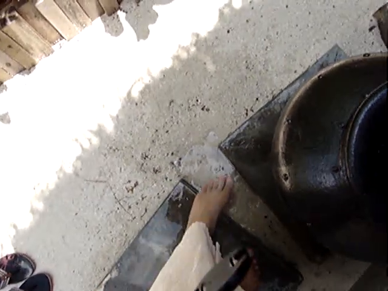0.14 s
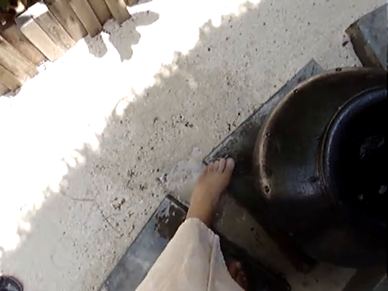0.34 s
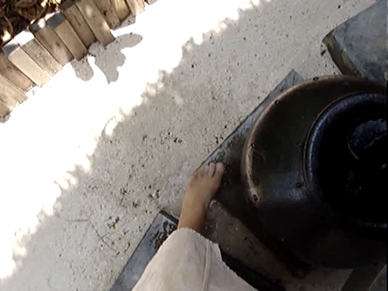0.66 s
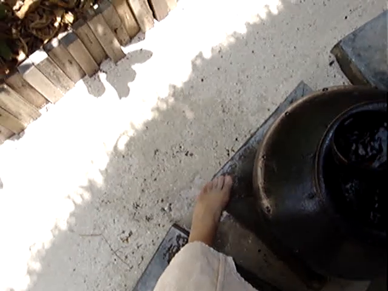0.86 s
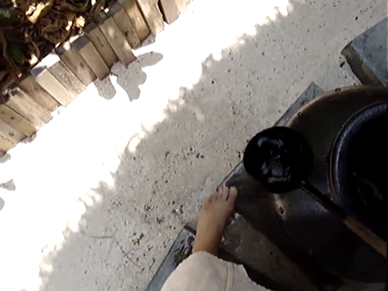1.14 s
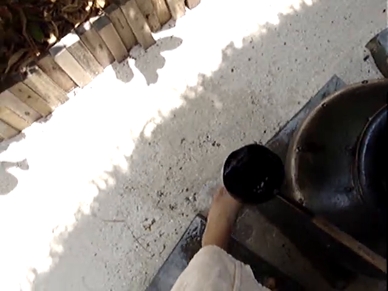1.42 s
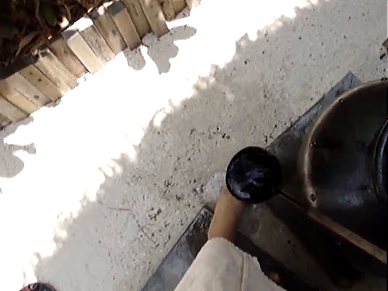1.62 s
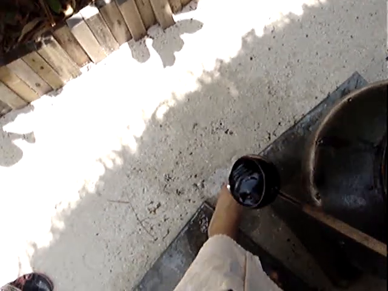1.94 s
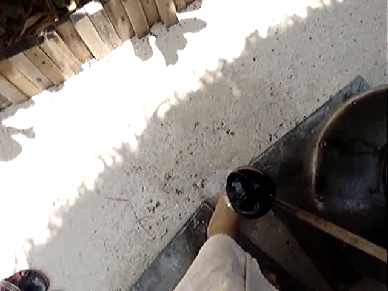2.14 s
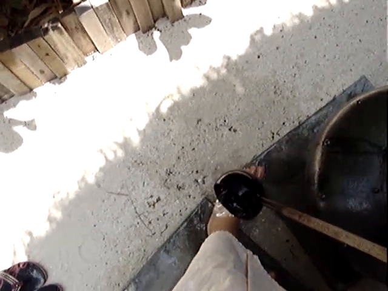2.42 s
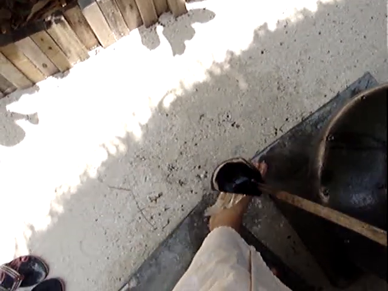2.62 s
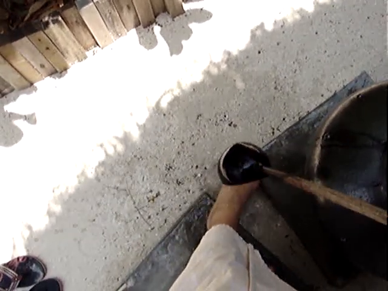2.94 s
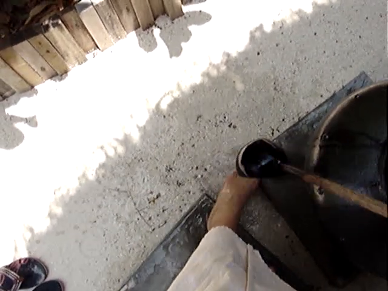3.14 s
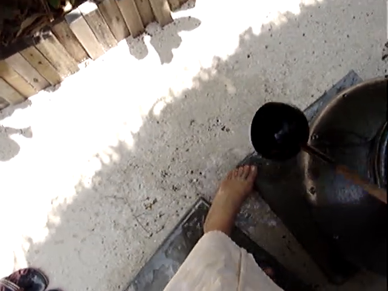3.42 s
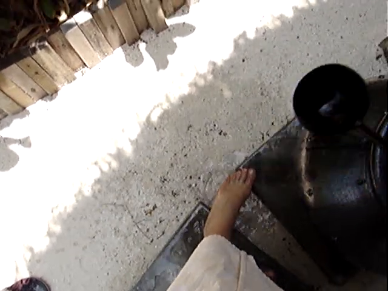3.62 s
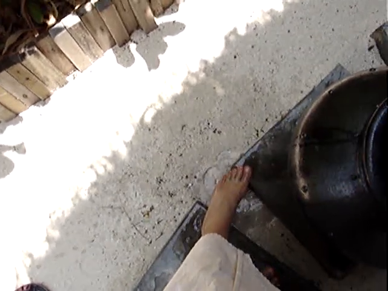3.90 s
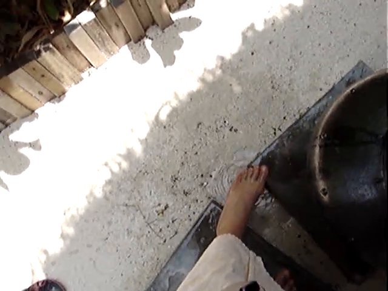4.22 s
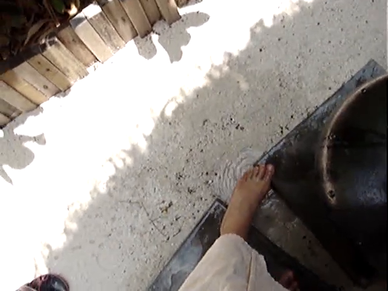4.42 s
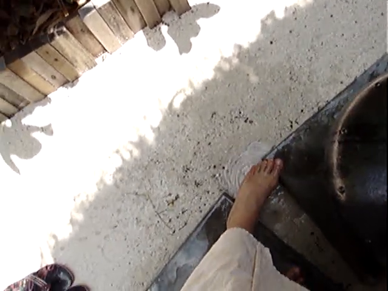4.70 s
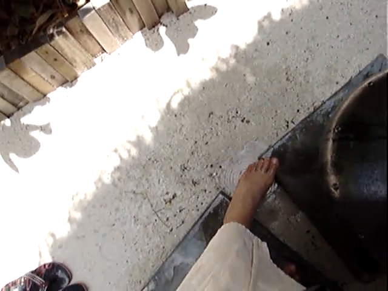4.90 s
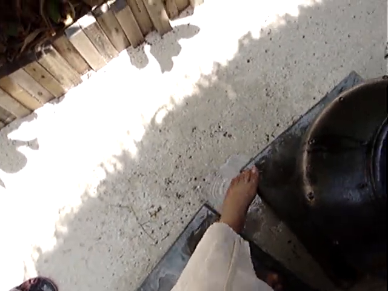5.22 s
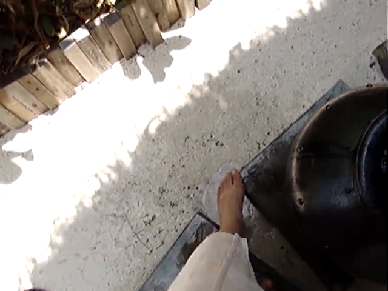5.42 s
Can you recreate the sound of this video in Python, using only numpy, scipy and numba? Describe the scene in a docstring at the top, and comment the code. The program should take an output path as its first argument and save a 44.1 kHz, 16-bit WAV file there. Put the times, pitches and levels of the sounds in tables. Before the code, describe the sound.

A ladle churns and scoops water in a big hollow jar, water trickles onto a foot and stone, a knock, then churning again.

```python
"""Ladling and pouring water outdoors

A ladle stirs and scoops water in a large glazed jar, then pours it over a foot onto a stone slab.
Bubbles are short sine pings, alone or in crowds; drops are a tick and a burst of bubbles and noise.
The ladle knocks the jar once; the jar answers with an echo and ringing tones.
Under it lie wavering low tones and the hiss of the open air, made of noise bands."""
import sys
import numpy as np
from scipy import signal
from scipy.io import wavfile
from scipy.ndimage import uniform_filter1d
from numba import njit

SR = 44100
rng = np.random.default_rng(int(sys.argv[2]) if len(sys.argv) > 2 else 0)


def pcm_store(signal):
    """Save signal as 16-bit PCM."""
    levels = np.round(np.clip(np.atleast_2d(signal), -1, 1) * 32767)
    wavfile.write(sys.argv[1], SR, levels.astype(np.int16).T)


N = 244755  # length of the sound [samples]

# Water churning in the jar, one curve for each movement of the ladle:
# (time [s], level [dB], big bubbles against that level [dB])
CHURNING = [
    [(0.0, -59, 6), (0.045, -42.5, -18), (0.14, -39, -15), (0.152, -30, -25), (0.235, -32.5, -12),
     (0.39, -38, -14), (0.53, -82, 2)],
    [(0.7, -57, -3), (0.8, -43.5, -21), (0.88, -57, 2), (1.1, -68, 17)],
    [(4.58, -70, 3), (4.66, -48, -3), (4.704, -34, -16.5), (4.79, -35, -10.5), (4.89, -49.5, -10),
     (5.05, -54, -3)],
    [(5.105, -50, 5), (5.115, -33.5, -1.5), (5.17, -36, -4), (5.2, -29.5, -6.5), (5.265, -32, -13.5),
     (5.28, -26, -13), (5.35, -31.5, -11), (5.39, -27.5, -11), (5.48, -34, -12), (5.55, -41, -2)],
]
# Single clear bubbles: (time [s], strength [dB], starting pitch [Hz], time to fall by 60 dB [s])
SINGLE_BUBBLES = [(0.029, -32, 1880, 0.029), (0.043, -9.5, 2686, 0.014), (0.129, -24, 2050, 0.019),
                  (0.15, -13.5, 1804, 0.014), (0.181, -19, 2340, 0.018), (0.193, -16, 2360, 0.019),
                  (0.23, -20, 1170, 0.031), (0.254, -15, 1174, 0.014), (0.271, -26, 1730, 0.023),
                  (0.288, -27, 1730, 0.023), (0.349, -14.5, 1795, 0.03), (0.432, -18.5, 1820, 0.019),
                  (0.544, -22.5, 3270, 0.016), (0.573, -19, 3378, 0.04), (0.739, -32, 2090, 0.073),
                  (0.768, -22, 3900, 0.02), (0.791, -21, 2330, 0.021), (0.869, -27, 3600, 0.016),
                  (0.888, -9.5, 2380, 0.019), (0.9889, -5.5, 2240, 0.021), (1.459, -34, 2430, 0.028),
                  (2.106, -22.5, 3340, 0.0088), (2.114, -24, 3060, 0.012), (2.171, -34, 2940, 0.02),
                  (2.217, -30.5, 2390, 0.019), (2.308, -38, 3480, 0.02), (2.5, -21.5, 1590, .015),
                  (2.501, -24, 3680, 0.025), (2.527, -8, 1566, 0.0094), (2.533, -12, 3170, 0.022),
                  (2.546, -14, 2520, 0.026), (2.576, -26, 3080, 0.022), (2.67, -28, 3650, 0.015),
                  (2.807, -21, 2550, 0.033), (2.832, -24, 2820, 0.049), (2.852, -19, 2250, 0.029),
                  (2.928, -28, 2930, 0.023), (3.232, -32, 2400, .02), (3.257, -33, 2960, 0.025),
                  (3.275, -33, 2700, .02), (4.385, -20.5, 2310, 0.014), (4.394, -24.5, 3400, 0.046),
                  (4.451, -21, 4080, 0.022), (4.464, -29, 2770, 0.018), (4.619, -24, 2500, 0.018),
                  (4.641, -22, 1245, 0.032), (4.666, -29.5, 1090, 0.038), (4.674, -17.5, 2370, 0.038),
                  (4.691, -11.5, 2360, 0.022), (4.697, -2.5, 2160, 0.016), (4.756, -21.5, 1800, 0.022),
                  (4.801, -26, 1290, 0.025), (4.757, -30.5, 417, 0.024), (4.933, -29, 400, 0.02),
                  (4.94, -29.5, 890, 0.022), (5.065, -29, 483, 0.063), (5.114, -10.5, 1900, 0.0075),
                  (5.16, -13.5, 2660, 0.025), (5.178, -14.5, 1020, 0.016), (5.192, -15.5, 1735, 0.029),
                  (5.277, -7, 1150, 0.0092), (5.2775, -2.5, 2020, 0.01), (5.285, -2.5, 2450, 0.012),
                  (5.3, -25, 2400, 0.02), (5.328, -24.5, 404, 0.072), (5.376, -16, 1980, 0.025),
                  (5.389, -10.5, 1810, 0.019), (5.409, -24, 1756, 0.03), (5.44, -23, 2680, 0.022),
                  (5.461, -10.5, 2687, 0.025), (5.503, -17, 3185, 0.032)]
# The stream breaking on foot and slab: (time [s], level [dB], lower drops against that level [dB])
STREAM = [
    [(2.43, -62, 8.5), (2.49, -39.5, -2.5), (2.525, -39.5, 14), (2.57, -49.5, 8), (2.74, -62, 4),
     (2.775, -75, -1), (2.8, -42, 12), (2.89, -47, -0.5), (2.954, -42, 1), (3.0, -51, -1),
     (3.16, -52.5, -21), (3.27, -49.5, 8), (3.45, -67, -7)],
]
# Drops bursting on water or stone:
# (time [s], treble level [dB], treble centre [Hz], body against treble [dB], time to fall by 60 dB [s])
DROPS = [(0.027, -27, 8000, -23, 0.043), (0.251, -23.5, 7300, -15, 0.073), (0.387, -33, 8000, -15, 0.018),
         (0.409, -26, 7810, -18, 0.041), (0.4586, -38.5, 4550, 17, 0.031), (0.541, -32, 8800, -1, 0.041),
         (0.5732, -22.5, 5040, -2, 0.064), (0.6618, -30.5, 7700, -24, 0.043),
         (0.7253, -25, 5660, -10, 0.11), (0.7888, -21.5, 6260, -11, 0.03), (0.8674, -17.5, 4930, 9, 0.049),
         (0.988, -29.5, 5300, 4, 0.045), (1.461, -36, 6000, -5, .04), (1.4774, -25, 5150, -6.5, 0.033),
         (1.525, -38.5, 8000, -15, .04), (1.7965, -25, 8640, -7, 0.03), (1.806, -29, 7500, -8, 0.027),
         (1.818, -33, 7500, -3, .03), (1.8309, -11.5, 4630, -26, 0.014), (1.8771, -30, 7100, 2, 0.023),
         (1.917, -32.5, 8460, -2, 0.034), (2.0905, -11.5, 9500, -9, 0.022), (2.107, -46.5, 4500, 14, 0.077),
         (2.1206, -22, 7630, 2.5, 0.029), (2.131, -23, 6270, -22, 0.012), (2.1537, -19.5, 9310, -22, 0.034),
         (2.1712, -25.5, 4400, 5.5, 0.03), (2.188, -28, 9370, -2, 0.04), (2.2, -31, 7500, 0, .04),
         (2.217, -34, 7500, -3, 0.036), (2.2423, -25.5, 9300, -16, 0.03), (2.308, -30, 4760, 3.5, 0.029),
         (2.384, -22.5, 7200, -9.5, 0.029), (2.3914, -25, 8020, -9, 0.028), (2.4063, -14, 8900, -2, 0.0064),
         (2.4382, -20.5, 8750, -15, 0.03), (2.458, -31, 7000, -8, .04), (2.484, -23.5, 8900, -21, 0.053),
         (2.5443, -17, 8400, 3, 0.025), (2.669, -30, 5540, 3, 0.049), (2.7225, -22, 7260, -22, 0.041),
         (2.738, -17.5, 4640, -22, 0.021), (2.789, -21, 4830, -1, 0.05), (2.827, -23.5, 8700, 5, 0.039),
         (2.95, -22.5, 8700, -5, 0.044), (3.1677, -30, 6800, -10, 0.027), (3.225, -34, 4760, 2.5, 0.043),
         (3.4221, -30, 8300, -18, 0.023), (4.0346, -22, 5840, -11, 0.034),
         (4.0533, -20.5, 5450, -3.5, 0.075), (4.387, -50.5, 4500, 17, 0.23),
         (4.4303, -28, 4500, -17, 0.052), (4.451, -41.5, 5000, 6, 0.11), (4.568, -37, 6270, -17, 0.045),
         (4.595, -29.5, 5400, -14, 0.086), (4.64, -27, 4650, 6, 0.055), (4.678, -34.5, 5960, 10.5, 0.072),
         (4.905, -33.5, 6660, -10, 0.07), (5.0047, -42.5, 4580, 16, 0.038), (5.1137, -34, 4770, 16, 0.05),
         (5.1905, -19.5, 6160, 11, 0.057), (5.3684, -20, 4900, 6, 0.09), (5.5069, -23, 5200, 1.5, 0.12)]
# Pushes of the ladle on the wall: (time after the blow [s], share of force [1])
PUSHES = [(0, 0.92), (.0037, 0.5), (.0083, 0.23), (.033, 0.14)]
# Ringing tones of the jar's wall and air: (pitch [Hz], relative level [dB], time to fall by 60 dB [s])
JAR_TONES = [(147.4, -7.5, 0.52), (292, -6, 0.12), (432.4, -4.5, 0.26), (493, -8.5, 0.09),
             (523, -17.5, 0.49), (566, -16, 0.11), (677, -29, 0.4), (728, -17, 0.4), (720, -26.5, 0.085),
             (798, -5.5, 0.12), (833, -8.5, 0.16), (849, -19.5, 0.9), (982, -0.5, 0.079), (1130, -19, 0.11),
             (1192, -4, 0.1), (1345, -8, 0.14), (1490, -18.5, 0.57), (1760, -17, 0.35), (2140, -23, 0.23),
             (2154, -3.5, 0.051), (2586, -11, 0.074)]
# Times when the ladle works in the jar: (start [s], end [s])
LADLE_IN_JAR = [(0, 1), (4.55, 5.55)]
# Colour of the open-air hiss: (frequency [Hz], relative level per Hz [dB])
HISS_COLOUR = [(30, -1), (60, -9), (110, -11.5), (200, -10), (300, -9), (500, -10.5), (1000, -16.5),
               (1500, -20), (3000, -23), (6000, -30.5), (10000, -36)]
# Loudness of the open-air hiss: (time [s], level [dB])
HISS_LEVEL = [(0.0, -43.5), (0.28, -42.5), (0.75, -44.5), (2.0, -48), (3.2, -46), (4.0, -48), (4.2, -45),
              (5.55, -43.5)]
# Distant low tones: (pitch [Hz], size of the pitch waver [Hz], level [dB])
LOW_TONES = [(117.4, 3.09, -55), (137.3, 4.33, -57.5), (178.5, 8, -57)]

SPRAY_DB = -7  # fine bubbles and spray against the churning
CLUMP_DB = 3  # how much a crowd of bubbles thickens and thins
JAR_AIR_HZ, JAR_AIR_Q, JAR_AIR_DB = 518, 20.5, 20.5  # hum of the air above the water
TICK = 0.2  # strength factor of the tick in a bursting drop
KNOCK_S, KNOCK_DB, CRACK_DB = 4.0348, -11, -13
HOLLOW_DB, HOLLOW_T60_S = -10.5, 0.22  # echo inside the jar
FIRST_ECHO_S = 0.011  # the echo takes this long to build
WALL_DB = -40  # how much the water shakes the jar's wall
BASS_HZ, TOP_HZ = 98.8, 10050  # limits of the microphone and the recorder


def undb(db):
    """Turn a level in dB into a gain."""
    return 10 ** (np.asarray(db) / 20)


def unit(x):
    """Scale to an average strength (rms) of 1."""
    return x / np.sqrt(np.mean(x ** 2))


def fade(t, t60):
    """Die away by 60 dB in t60 seconds."""
    return np.exp(-np.log(1000) * t / t60)


def band(x, lo_hz, hi_hz):
    """Keep only the frequencies between two limits."""
    edges = [lo_hz, min(hi_hz, .45 * SR)]
    return signal.sosfilt(signal.butter(3, edges, "bandpass", fs=SR, output="sos"), x)


def band_noise(lo_hz, hi_hz):
    """Steady noise between two frequencies, rms 1."""
    return unit(band(rng.standard_normal(N), lo_hz, hi_hz))


def walk(rate):
    """Wander at random: levels held 1 / rate s, then smoothed twice; rms 1."""
    k = int(SR / rate)
    steps = np.repeat(rng.standard_normal(N // k + 1), k)
    smooth = uniform_filter1d(uniform_filter1d(steps, k), k)
    return unit(smooth[:N])


def track(tables):
    """Draw table columns as curves over time; the first (dB) drops to -120 outside the tables."""
    rows, t = np.vstack(tables), np.arange(N) / SR
    columns = [np.interp(t, rows[:, 0], c) for c in rows.T[1:]]
    inside = sum((t >= table[0][0]) & (t <= table[-1][0]) for table in tables)
    return [np.where(inside, columns[0], -120.)] + columns[1:]


@njit
def grains(n, sr, s, hz, t60, size, rise, glide):
    """Bubble pings: fading sines that swell over rise * t60 and climb in pitch by the share glide."""
    out = np.zeros(n)
    for k in range(len(s)):
        start, length = int(s[k] * sr), int(t60[k] * sr)
        phase, swell = 0., 1.
        a, fall = size[k], np.exp(-np.log(1000.) / length)
        quick = np.exp(-1 / (rise * length + 1))
        for i in range(min(length, n - start)):
            phase += 2 * np.pi * hz[k] * (1 + glide * i / length) / sr
            a, swell = a * fall, swell * quick
            out[start + i] += a * (1 - swell) * np.sin(phase)
    return out


def swarm(rate, centre_hz, octaves, cycles, scatter_db):
    """A crowd of `rate` bubbles a second at random moments, pitches and sizes; rms 1."""
    moment, ring, chance = rng.random((int(rate * N / SR), 3)).T
    hz = centre_hz * 2 ** (octaves * rng.standard_normal(len(moment)))
    hz = np.clip(hz, 250, 10000)
    t60 = cycles * (.5 + ring) / hz
    size = undb(-scatter_db * np.log(1 - .95 * chance))
    size = size * np.sqrt(hz / centre_hz)  # high, short rings start stronger
    crowd = grains(N, 1. * SR, moment * (N - 1) / SR, hz, t60, size, 0.32, 0.095)
    return unit(crowd * undb(CLUMP_DB * walk(45)))  # bubbles come in clumps


def slosh():
    """Churning water: dense crowds of bubbles of three sizes, with spray noise and humming jar air."""
    db, big_db = track(CHURNING)
    big_gain = undb(db + big_db)
    fine = swarm(1200, 3855.0, 0.417, 30, 4.2) + 0.38 * band_noise(4500, 8830)
    medium = swarm(500, 2101.0, 0.335, 34, 4.1)
    big = big_gain * swarm(250, 1003.0, 0.457, 26, 6.1)
    # noise that follows the big bubbles' level sets the air humming
    b, a = signal.iirpeak(JAR_AIR_HZ, JAR_AIR_Q, SR)
    hum = undb(JAR_AIR_DB) * signal.lfilter(b, a, big_gain * rng.standard_normal(N))
    return undb(db) * (medium + undb(SPRAY_DB) * fine) + big + hum


def bubbles():
    """Clear single bubbles, each a soft-edged ping that rises slightly in pitch."""
    s, db, hz, t60 = np.transpose(SINGLE_BUBBLES)
    return grains(N, 1. * SR, s, hz, t60, undb(db), 0.063, 0.044)


def spatter():
    """The stream shatters into short high grains and lower drops."""
    db, low_db = track(STREAM)
    high = swarm(4000, 6700.0, .35, 27, 9.7)
    low = swarm(900, 2890.0, 0.445, 14.0, 3.3)
    return undb(db) * (high + undb(low_db) * low)


def splats():
    """Each drop is a noisy tick and a ragged burst of tiny bubbles over a lower body."""
    spray = swarm(5000, 6450.0, 0.56, 5.1, 6.3)
    body = swarm(3500, 3160.0, 0.28, 19.0, 2.3)
    snap, out = band_noise(2160, 9100), np.zeros(N)
    for s, db, hz, body_db, t60 in DROPS:
        i = int(s * SR)
        t = np.arange(min(int(t60 * SR), N - i)) / SR
        span = slice(i, i + len(t))
        shape = 0.57 * (1 - np.exp(-t / 0.0019)) * fade(t, t60)
        tick_shape = TICK * t / 0.000093 * np.exp(-t / 0.00047)
        tick = tick_shape * unit(band(snap[span], hz * 0.71, 11000))
        treble = unit(band(spray[span], hz * 0.8, hz * 1.56))
        burst = shape * (treble + undb(body_db) * body[span])
        out[span] += undb(db) * (tick + burst)
    return out


def knock():
    """The ladle hits the wall and chatters against it: a push, weaker after-pushes and a dull crack."""
    t = np.arange(N) / SR - KNOCK_S
    push = sum(size * np.exp(-((t - late_s) / 0.000066) ** 2) for late_s, size in PUSHES)
    crack = (t > 0) * np.exp(-np.maximum(t, 0) / .014) * band_noise(494, 1270)
    return undb(KNOCK_DB) * jar_ring(-push / 10) + undb(CRACK_DB) * crack


def jar_ring(force):
    """A force sets the jar ringing at its own pitches, each dying away at its own speed."""
    t = np.arange(SR) / SR
    ring = sum(undb(db) * fade(t, t60) * np.sin(2 * np.pi * hz * t) for hz, db, t60 in JAR_TONES)
    return signal.fftconvolve(force, ring)[:N]


def echo(x, t60, lo_hz, hi_hz):
    """Dense reflections, drawn as noise, that build quickly and die away."""
    t = np.arange(int(t60 * SR)) / SR
    reflections = band(rng.standard_normal(len(t)), lo_hz, hi_hz)
    tail = reflections * fade(t, t60) * np.minimum(t / FIRST_ECHO_S, 1)
    return signal.fftconvolve(x, tail / np.sqrt(np.sum(tail ** 2)))[:N]


def over_jar(t):
    """True while the ladle works in the jar, so that its water sounds reach the hollow."""
    return sum((t >= start) & (t <= end) for start, end in LADLE_IN_JAR)


def open_air():
    """Hiss of the open air: half-octave steps of noise bands that flicker a little in level."""
    hiss, colour = 0, np.array(HISS_COLOUR)
    for hz in 35 * 2 ** np.arange(0, 8.3, .5):
        db = np.interp(np.log(hz), np.log(colour[:, 0]), colour[:, 1])
        db = db + 10 * np.log10(hz) + 0.75 * walk(9)  # a higher band is wider, so it holds more
        hiss = hiss + undb(db) * band_noise(hz * 0.812, hz * 1.14)
    return undb(track([HISS_LEVEL])[0]) * unit(hiss)


def distant_hum():
    """Low sine tones that waver in pitch and level."""
    hum = 0
    for hz, waver, db in LOW_TONES:
        phase = 2 * np.pi * np.cumsum(hz + waver * walk(4)) / SR
        hum = hum + undb(db + 1.3 * walk(1.03)) * np.sqrt(2) * np.sin(phase)
    return hum


def scene():
    """Water, knock and background; what happens in the jar also rings its hollow and wall."""
    water = slosh() + bubbles() + spatter() + splats()
    inside, hit = over_jar(np.arange(N) / SR) * water, knock()
    hollow = undb(HOLLOW_DB) * echo(inside + .5 * hit, HOLLOW_T60_S, 297, 4070)
    wall = undb(WALL_DB) * jar_ring(inside)
    return (water + hit + hollow + wall + open_air() + distant_hum())[None]


def record(dry):
    """The small microphone loses the deep bass; the recorder cuts the top steeply."""
    thin = signal.sosfilt(signal.butter(4, BASS_HZ, "highpass", fs=SR, output="sos"), dry)
    return signal.sosfilt(signal.ellip(12, .3, 75, TOP_HZ, fs=SR, output="sos"), thin)


dry = scene()
out = record(dry)
pcm_store(out)
```